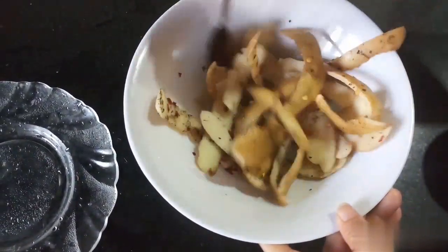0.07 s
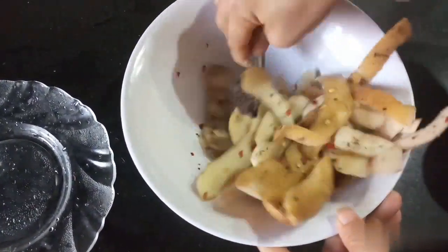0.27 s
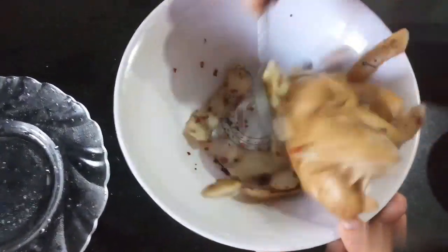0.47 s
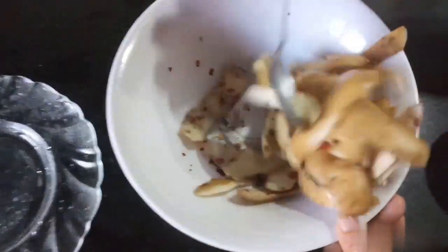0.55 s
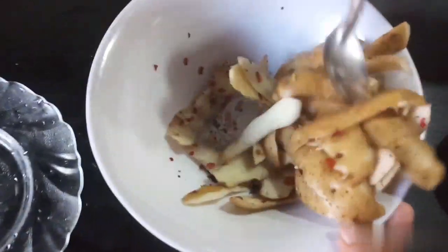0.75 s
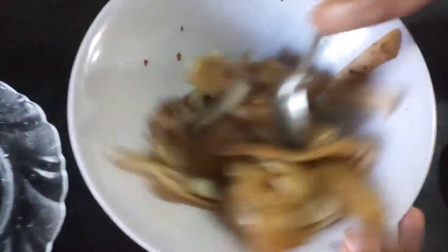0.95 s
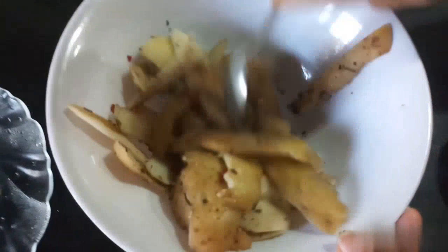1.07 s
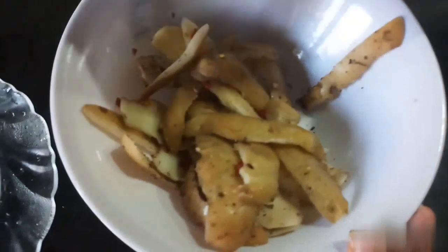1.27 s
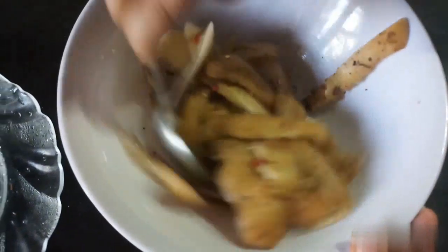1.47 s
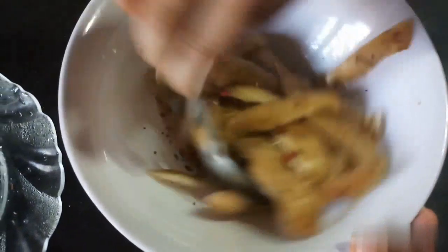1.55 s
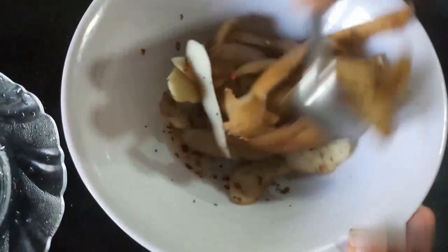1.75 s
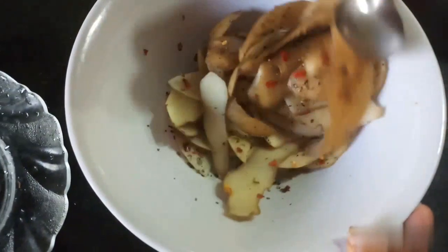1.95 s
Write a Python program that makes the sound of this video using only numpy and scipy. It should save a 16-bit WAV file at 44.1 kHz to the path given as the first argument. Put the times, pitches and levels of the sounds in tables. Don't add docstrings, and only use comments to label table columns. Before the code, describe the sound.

A steel spoon stirs food in a ceramic bowl: one sharp clang, gritty scrapes, small clinks

```python
import sys
import numpy as np
from scipy import signal
from scipy.fft import rfft, irfft, next_fast_len
from scipy.io import wavfile
from scipy.ndimage import uniform_filter1d, map_coordinates

SR = 44100
rng = np.random.default_rng(int(sys.argv[2]) if len(sys.argv) > 2 else 0)


def volts_from_db(level):
    exponent = np.asarray(level, float) / 20
    return 10 ** exponent


def wav_out(sig):
    wavfile.write(sys.argv[1], SR, np.round(np.clip(np.atleast_2d(sig).T, -1, 1) * 32767).astype(np.int16))


N = 88200
T = np.arange(N) / SR

# start_s, level_db
RUMBLE_LEVEL = [
    [(0.0, -56), (0.048, -58), (0.104, -57), (0.134, -55), (0.17, -58)],
    [(0.3, -55), (0.72, -59), (1.408, -60.5), (1.426, -55.5), (2.0, -50)],
]
# freq_hz, density_db_per_hz
RUMBLE_COLOUR = [(12, -63), (20, -24), (80, -3.5), (119, -6.5), (145, -7.5), (380, -6.5), (700, -17.5),
                 (910, -44.5), (1540, -120)]
# freq_hz, level_db
MAINS_LINES = [(146, -65), (195, -70.5)]
# freq_hz, density_db_per_hz
HISS_COLOUR = [(290, -35), (500, -11), (760, -2.5), (1580, -10.5), (2460, -16.5), (4000, -17),
               (8600, -17.5), (10500, -41.5)]
HISS_DB = -60.5

# start_s, level_db
HUM_LEVEL = [(0.0, -67), (0.11, -46.5), (0.27, -46.5), (0.62, -69), (0.66, -86), (0.72, -62), (0.92, -63.5),
             (0.98, -90), (1.05, -85), (1.64, -81), (1.7, -49), (1.84, -59.5), (1.87, -60), (2.0, -65)]
# start_s, level_db
SWAY_LEVEL = [(0, -75.5), (1.15, -78.5), (1.27, -63.5), (1.5, -66.5), (1.6, -80), (1.9, -67), (2, -59)]
HUM_HZ, SWAY_HZ, COUNTER_WANDER_RATIO = 75.6, 48, 0.013

# pitch_hz, level_db, t60_s
HORN_PARTIALS = [(370, -67, 1.2), (414, -73, .9), (2555, -63, .2), (2575, -72, 2), (2910, -76, .3),
                 (3310, -67, .35)]
HORN_START_S, HORN_ATTACK_S, HORN_HOLD_S, HORN_WAVER_HZ = 1.515, .055, .075, 28

# freq_hz, t60_s
ROOM_DECAY = [(200, 0.24), (1000, 0.5), (4000, 0.44), (10000, 0.25)]
ROOM_DB, ROOM_GAP_S = -7.5, .004

# start_s, level_db, dull_share_db
SCRAPE_STROKES = [
    [(0, -50.5, 4), (.078, -61.5, -5), (.16, -69.5, 8), (.19, -69.5, 9)],
    [(.27, -31, -25), (.31, -33.5, -10), (.345, -32.5, -9), (.40, -41.5, -10.5), (.455, -40, -11),
     (.55, -57.5, -2.5), (.59, -54.5, -3.5), (.75, -73.5, -3)],
    [(.9, -71.5, -7), (.95, -68, -14), (1.03, -66, -17), (1.045, -47, -15), (1.095, -57.5, -6),
     (1.12, -44, -14), (1.225, -49.5, -8.5), (1.25, -43.5, -12.5), (1.295, -44, -17)],
    [(1.315, -57, -7.5), (1.36, -68, 3), (1.42, -83, 9.5)],
    [(1.6, -64.5, -3), (1.625, -47.5, -10), (1.648, -55, -8), (1.685, -39, -26), (1.74, -48.5, -3.5),
     (1.78, -46.5, -7), (1.89, -52, -7), (1.97, -49, -11.5), (2, -46, -7)],
]
# freq_hz, width_hz, level_db
SCRAPE_PEAKS = [(4150, 130, 1), (5080, 160, -7), (5700, 51, 0.5), (6100, 180, -9.5), (8100, 160, 1.5),
                (8590, 90, -8)]
# freq_hz, density_db_per_hz
SCRAPE_BRIGHT = [(1060, -29.5), (1800, -4.5), (3010, -3.5), (4010, 1.5), (8550, -0.5), (11000, -8),
                 (14000, -8)]
# freq_hz, density_db_per_hz
SCRAPE_DULL_COLOUR = [(500, -14), (750, 2.5), (1300, 7), (2000, -11.5), (3000, -37.5)]
# freq_hz, depth_db
PATCH_DEPTH = [(2000, 3), (9000, 3), (10500, 5)]
GRIT_RATE_PER_S, GRIT_SPREAD_DB, GRIT_SHARE, PEAK_GAIN = 1500, 1.5, 0.56, 0.94

# start_s, peak_db, t60_s
CRUMB_SNAPS = [(.345, -29, .02), (0.65, -49.5, .02), (0.814, -51.5, .02), (1.017, -52.5, .015),
               (1.0389, -35, 0.0083), (1.79, -33, .012), (1.612, -50, .02), (1.054, -46, .02),
               (1.2413, -38, 0.022), (1.5029, -51.5, 0.033), (1.6216, -43, 0.055), (1.6599, -42, 0.046),
               (1.683, -39, 0.023), (1.699, -61, 0.026), (1.923, -52, 0.035)]
# freq_hz, density_db_per_hz
SNAP_COLOUR = [(800, -18.5), (2000, -15), (3300, -8), (4200, 2.5), (6000, 5.5), (8500, 0), (10000, -11),
               (15000, -13)]
TOUCH_START_S = [1.685, 1.7, 1.715, 1.328, 1.039, 1.679, 1.7925, 1.791, 1.79, 1.79, .9975]
# pitch_hz, level_db, t60_s
TOUCH_MODES = [(2800, -40.5, 0.03), (990, -33, 0.021), (960, -39, 0.036), (4900, -56, .02),
               (7140, -35, 0.016), (5700, -34, 0.023), (5570, -36, 0.023), (12000, -33, 0.019),
               (4320, -46, 0.03), (1510, -44, 0.036), (4060, -55, .012)]

# start_s, peak_db, spoon_pitch_hz, knock_db, spoon_t60_s
TAP_EVENTS = [(.348, -32, 5630, -60, 0.013), (.649, -70, 4326, -35, 0.02), (1.038, -31.5, 8140, -56, 0.02),
              (1.041, -37, 5370, -67, 0.01), (1.28, -48, 6400, -32, .04), (1.112, -45, 3960, -49, 0.032),
              (1.613, -39, 4200, -29, 0.028), (1.672, -35, 4095, -19.5, 0.059),
              (1.683, -60, 5300, -25, .02), (1.685, -31.5, 7070, -42, 0.035),
              (1.790, -29, 5810, -53, 0.022), (1.795, -28, 5610, -54, 0.012),
              (1.975, -42, 1330, -59, 0.065), (.105, -54.5, 3750, -90, 0.494)]
# pitch_ratio, level_db
SPOON_MODES = [(1, 0), (.585, -5), (1.27, -5)]
# pitch_hz, level_db, t60_s
KNOCK_MODES = [(716, -3.5, 0.02), (781.5, 3, 0.032), (927, 4.5, 0.0226), (995, -3.5, 0.023),
               (1293, -14.5, 0.016)]
TAP_SCATTER_DB = 2.5

# start_s, peak_db
BLOW_EVENT = [
    (.2067, -1),
]
# pitch_hz, level_db, t60_s
BOWL_MODES = [(2022, -17, 0.27), (687, -4, .15), (770, -3, .22), (884, -7, 0.07), (950, -3.5, .2),
              (1083, 7, 0.028), (1022, -12.5, .2), (1304, -10, .35), (2445, -7, 0.24), (2613, -5.5, .3),
              (2670, 4.5, 0.091), (3170, -11.5, .13), (3994, -8.5, 0.26), (4376, -11.5, .25)]
# pitch_hz, level_db, t60_s
STEEL_MODES = [(5330, -10.5, .15), (5550, -8, .25), (5935, -9.5, .3), (6040, 15.5, .035), (6075, -8, .2),
               (6180, -7.5, 0.18), (6470, -8, .2), (6900, -6.5, 0.15), (7410, -5, .25), (8570, -3, .2),
               (9190, -11.5, .15), (10760, -2.5, .15), (11060, -2.5, .15), (12400, -12.5, .3)]
# freq_hz, density_db_per_hz
CRACK_LOW = [(300, -8.5), (520, -17.5), (800, -4), (1300, -0.5), (1900, -18), (2600, -4.5), (3400, -6.5),
             (6150, 0)]
# freq_hz, density_db_per_hz
CRACK_HIGH = [(6150, 0), (9000, -2), (12000, -13.5), (13200, -11)]
CONTACT_S, CHATTER_S, CHATTER_FALL_DB = .0008, .006, 4
CRACK_T60_S, CRACK_AFTER_DB, RING_DB, THUD_DB = 0.11, -10, -21, -27.5
RING_ROUGH_RAD, RING_SHAKE_PER_S = .95, 100
SPARK_DB, SPARK_T60_S, SPARK_HZ = -17, .009, 12500

# freq_hz, gain_db
MIC_RESPONSE = [(25, -12.5), (55, -0.5), (9100, -1.5), (9850, -16), (10600, -7.5), (12600, -9.5),
                (13400, -14), (15900, -22.5)]


def unit(x):
    return x / np.sqrt(np.mean(x ** 2) + 1e-20)


def along(points, hz):
    f, v = np.transpose(points)
    return np.interp(np.log(hz + 1), np.log(f + 1), v)


def joined(tables):
    s, *cols = np.concatenate(tables).T
    return [np.interp(T, s, c) for c in cols]


def wobble(rate_per_s):
    knots = rng.standard_normal(int(N * rate_per_s / SR) + 4)
    return map_coordinates(knots, [T * rate_per_s])


def coloured(x, gain):
    m = 2 * next_fast_len(N)
    cepstrum = irfft(np.log(gain(np.fft.rfftfreq(m, 1 / SR)) + 1e-6), m)
    cepstrum[1:m // 2] *= 2
    cepstrum[m // 2 + 1:] = 0
    return irfft(rfft(x, m) * np.exp(rfft(cepstrum)), m)[:len(x)]


def noise(points):
    return unit(coloured(rng.standard_normal(N), lambda hz: volts_from_db(along(points, hz))))


def ring(t, modes, blur=None, attack_s=0.00007):
    u = np.maximum(t, 0)
    out = np.zeros(N)
    for hz, db, t60_s in modes:
        phase = 2 * np.pi * hz * u + (blur() if blur else 0)
        out += volts_from_db(db - 60 * u / t60_s) * np.sin(phase)
    return (1 - np.exp(-u / attack_s)) * out


def patchy(x):
    hz, _, z = signal.stft(x, SR, nperseg=256)
    field = uniform_filter1d(rng.standard_normal(z.shape), size=4, axis=0)
    field = unit(uniform_filter1d(field, size=12, axis=1))
    z = z * volts_from_db(along(PATCH_DEPTH, hz)[:, None] * field)
    return unit(signal.istft(z, SR, nperseg=256)[1][:N])


def background():
    db, = joined(RUMBLE_LEVEL)
    rumble = volts_from_db(db + 1.5 * wobble(14)) * noise(RUMBLE_COLOUR)
    lines = sum(volts_from_db(g + 3 * wobble(16)) * np.sin(2 * np.pi * hz * T) for hz, g in MAINS_LINES)
    hiss = volts_from_db(HISS_DB + .8 * wobble(29)) * noise(HISS_COLOUR)
    return rumble + lines + hiss


def kitchen(x):
    hz, t, z = signal.stft(rng.standard_normal(SR), SR, nperseg=256)
    decay = volts_from_db(-60 * t / along(ROOM_DECAY, hz)[:, None])
    tail = signal.istft(z * decay, SR, nperseg=256)[1]
    delayed = np.pad(x, (round(ROOM_GAP_S * SR), 0))
    return signal.fftconvolve(delayed, tail / np.linalg.norm(tail))[:N]


def counter():
    out = np.zeros(N)
    for table, hz in (HUM_LEVEL, HUM_HZ), (SWAY_LEVEL, SWAY_HZ):
        db, = joined([table])
        phase = 2 * np.pi * np.cumsum(hz * (1 + COUNTER_WANDER_RATIO * wobble(15))) / SR
        out += np.sqrt(2) * volts_from_db(db + 1.5 * wobble(25)) * np.sin(phase)
    return out


def horn():
    t = T - HORN_START_S
    release_s = np.maximum(t - HORN_HOLD_S, 0)
    out = np.zeros(N)
    for hz, db, t60_s in HORN_PARTIALS:
        level = np.sqrt(2) * volts_from_db(db + 3.4 * wobble(45) - 60 * release_s / t60_s)
        out += level * np.sin(2 * np.pi * np.cumsum(hz + HORN_WAVER_HZ * wobble(40)) / SR)
    return np.clip(t / HORN_ATTACK_S, 0, 1) * out


def scrape():
    db, dull_db = joined(SCRAPE_STROKES)
    grains = (rng.random(N) < GRIT_RATE_PER_S / SR) * volts_from_db(GRIT_SPREAD_DB * rng.uniform(-0.1, 1, N))
    grains = grains * rng.choice([-1, 1], N)
    grit = GRIT_SHARE * unit(grains) + (1 - GRIT_SHARE) * rng.standard_normal(N)

    def bright_gain(hz):
        peaks = sum(volts_from_db(g) / (1 + (2 * (hz - c) / w) ** 2) for c, w, g in SCRAPE_PEAKS)
        return volts_from_db(along(SCRAPE_BRIGHT, hz)) * (1 + PEAK_GAIN * peaks)

    bright = patchy(coloured(grit, bright_gain))
    dull = unit(coloured(grit, lambda hz: volts_from_db(along(SCRAPE_DULL_COLOUR, hz))))
    dull = volts_from_db(dull_db + 0.5 * wobble(30)) * dull
    return volts_from_db(db - 2 + 1.5 * wobble(59.96)) * (bright + dull)


def crumbs():
    shape = sum(volts_from_db(db - 60 * np.abs(T - s) / t60_s) * (T > s) for s, db, t60_s in CRUMB_SNAPS)
    return noise(SNAP_COLOUR) * shape


def touches():
    return sum(ring(T - s, [mode], attack_s=0.00086) for s, mode in zip(TOUCH_START_S, TOUCH_MODES))


def taps():
    out, click_noise = np.zeros(N), noise(SCRAPE_BRIGHT)
    for s, db, hz, knock_db, t60_s in TAP_EVENTS:
        t = T - s
        spoon_modes = [(hz * r, g + rng.normal(0, TAP_SCATTER_DB), t60_s) for r, g in SPOON_MODES]
        knock_modes = [(f, g + rng.normal(0, TAP_SCATTER_DB), w) for f, g, w in KNOCK_MODES]
        spoon = ring(t, spoon_modes, lambda: .8 * wobble(120))
        click = click_noise * (t > 0) * volts_from_db(-60 * np.abs(t) / 0.011)
        out += volts_from_db(db) * (0.55 * spoon + 0.066 * click)
        out += volts_from_db(knock_db - 9) * ring(t, knock_modes, attack_s=0.0026)
    return out


def blow():
    (s, db), = BLOW_EVENT
    t = T - s
    u = np.maximum(t, 0)
    chatter_db = -CHATTER_FALL_DB * (u / CHATTER_S - 0.76) - 60 * np.maximum(u - CHATTER_S, 0) / .01
    shape = volts_from_db(chatter_db) + volts_from_db(CRACK_AFTER_DB - 60 * u / CRACK_T60_S)
    crack = np.clip(t / CONTACT_S, 0, 1) * shape * noise(CRACK_LOW + CRACK_HIGH[1:])
    ringing = ring(t, BOWL_MODES + STEEL_MODES, lambda: RING_ROUGH_RAD * wobble(RING_SHAKE_PER_S))
    spark = (t > 0) * volts_from_db(SPARK_DB - 60 * u / SPARK_T60_S) * noise([(SPARK_HZ - 2000, -30), (SPARK_HZ, 0)])
    thud = ring(t, [(97, 4.5, 0.033), (172.4, 2.0, 0.021), (296, 0.0, 0.035), (431, -9, 0.23)])
    return volts_from_db(db) * (0.35 * crack + volts_from_db(RING_DB) * ringing + spark + volts_from_db(THUD_DB) * thud)


def scene():
    hard, knocks, grit, far = blow(), taps() + crumbs() + touches(), scrape(), horn()
    wet = kitchen(hard) + 0.8 * kitchen(knocks) + 0.72 * kitchen(grit) + kitchen(far)
    direct = hard + knocks + grit + far
    return (direct + volts_from_db(ROOM_DB) * wet + counter() + background())[None]


def low_pass(x):
    return signal.sosfilt(signal.butter(12, 15940, fs=SR, output="sos"), x)


def record(dry):
    heard = coloured(dry[0], lambda hz: volts_from_db(along(MIC_RESPONSE, hz)) * (hz < 15950))
    return low_pass(heard[None])


dry = scene()
out = record(dry)
wav_out(out)
```